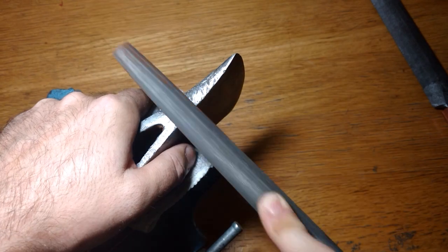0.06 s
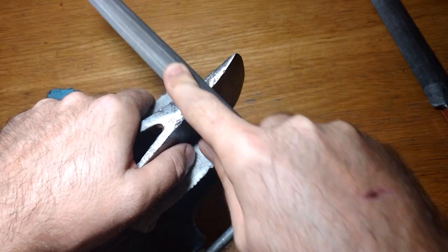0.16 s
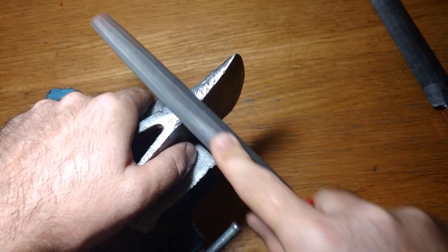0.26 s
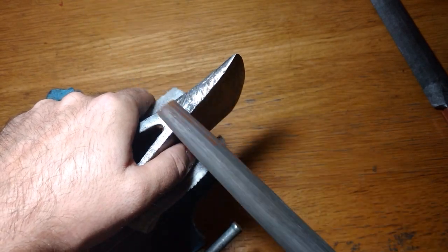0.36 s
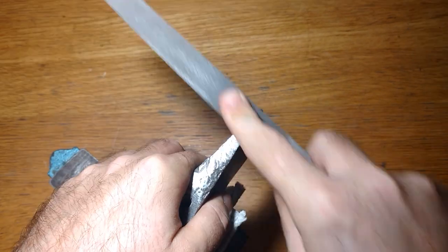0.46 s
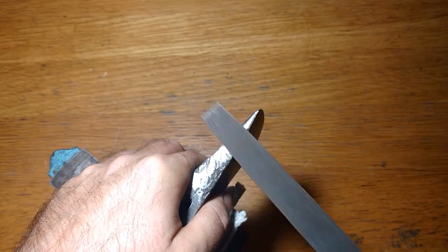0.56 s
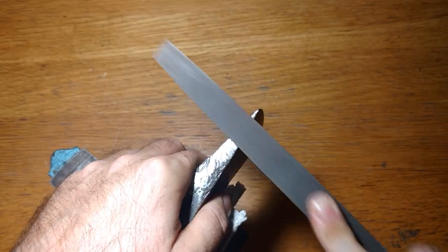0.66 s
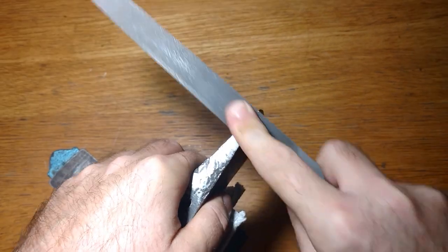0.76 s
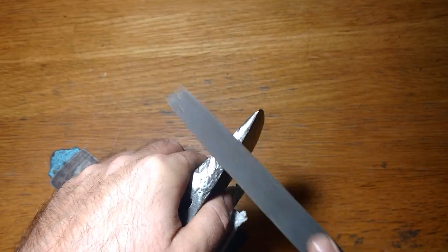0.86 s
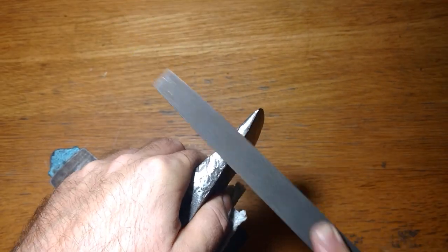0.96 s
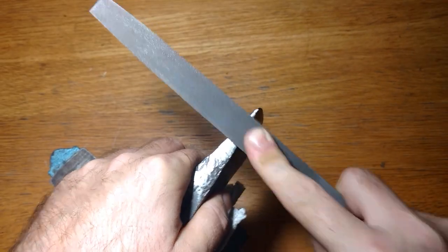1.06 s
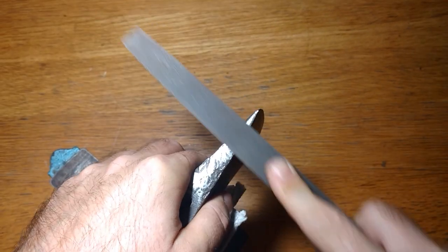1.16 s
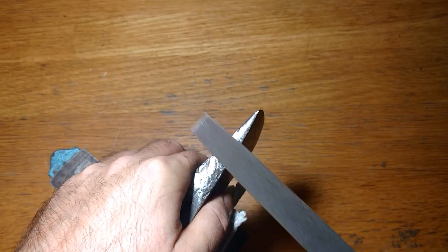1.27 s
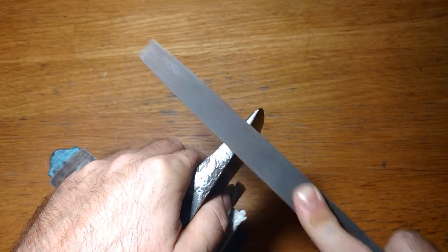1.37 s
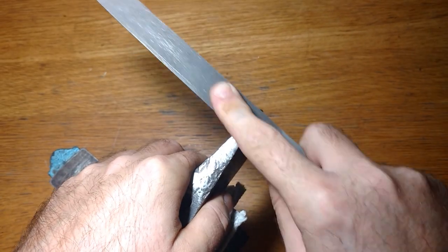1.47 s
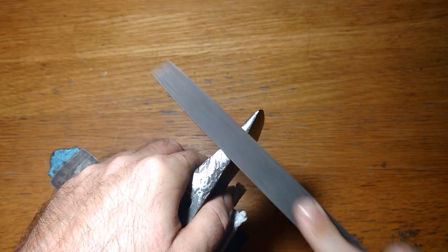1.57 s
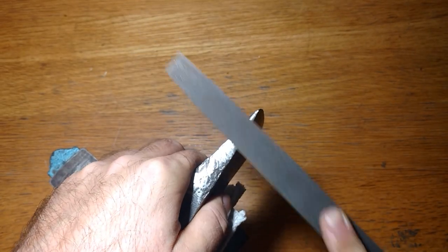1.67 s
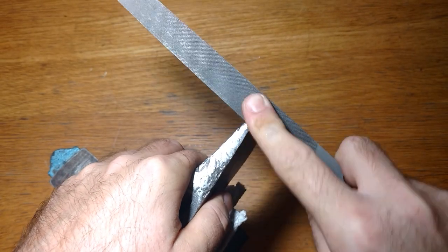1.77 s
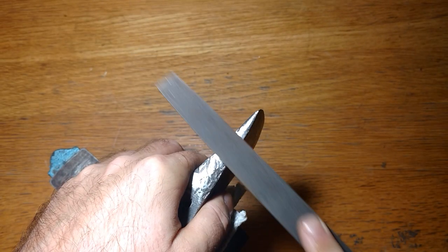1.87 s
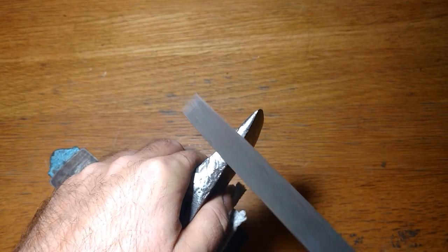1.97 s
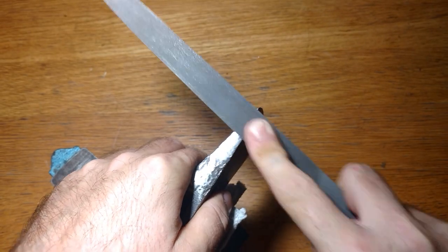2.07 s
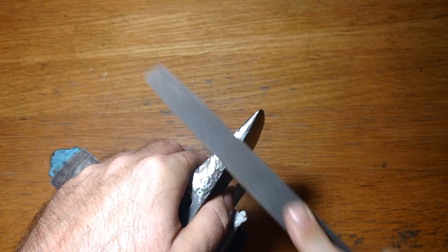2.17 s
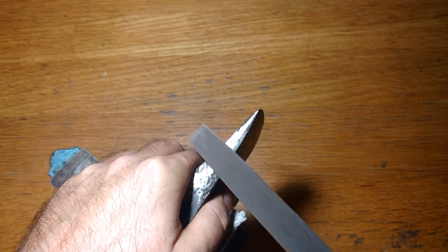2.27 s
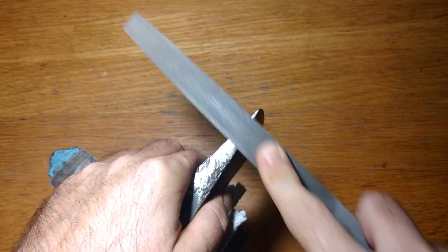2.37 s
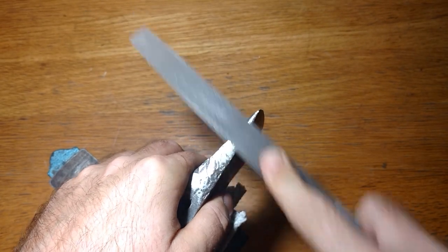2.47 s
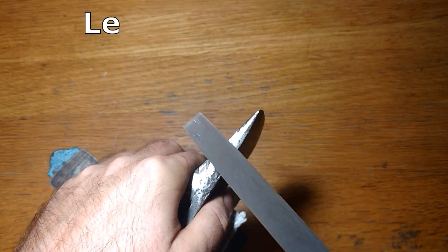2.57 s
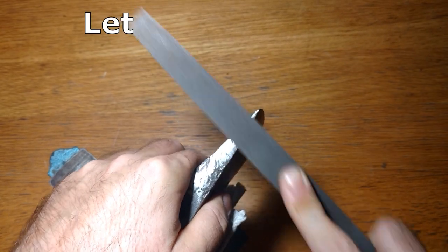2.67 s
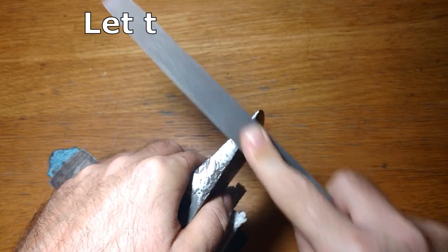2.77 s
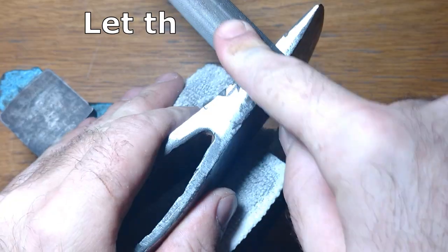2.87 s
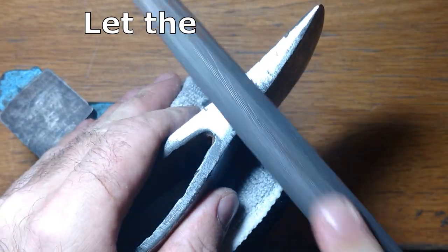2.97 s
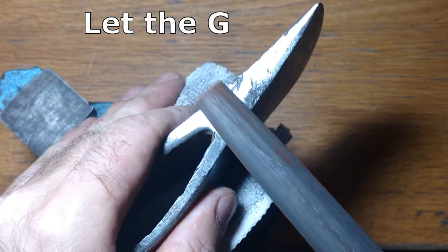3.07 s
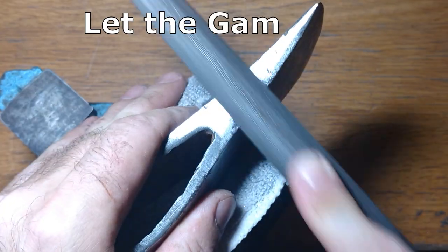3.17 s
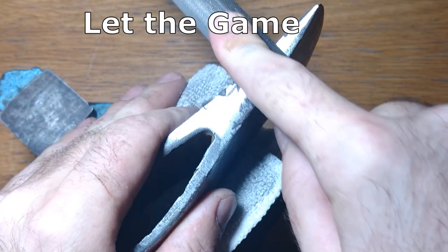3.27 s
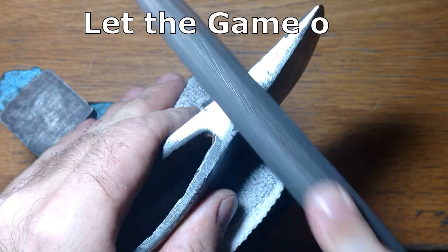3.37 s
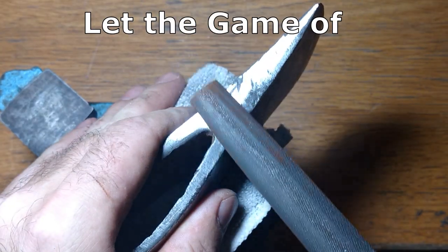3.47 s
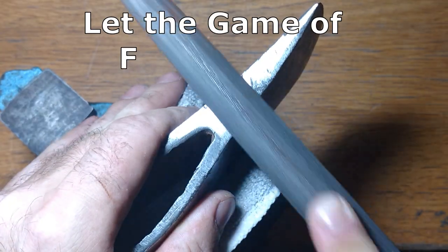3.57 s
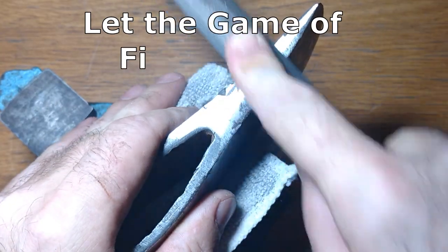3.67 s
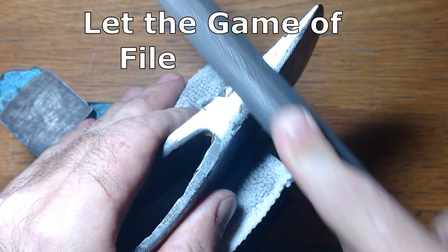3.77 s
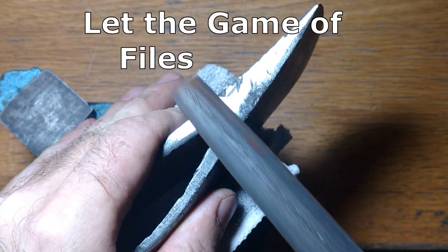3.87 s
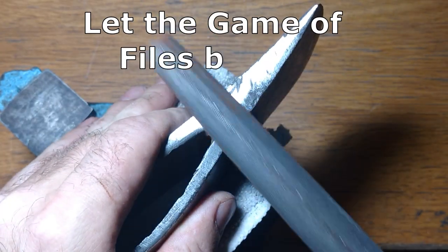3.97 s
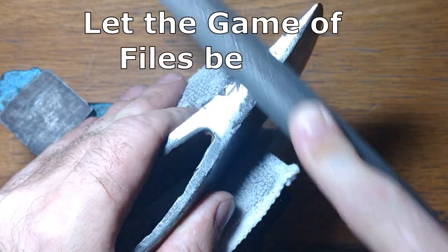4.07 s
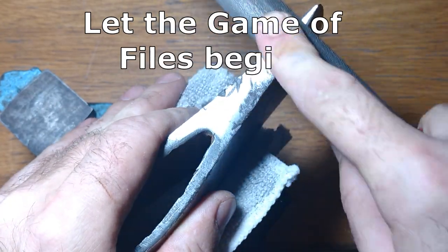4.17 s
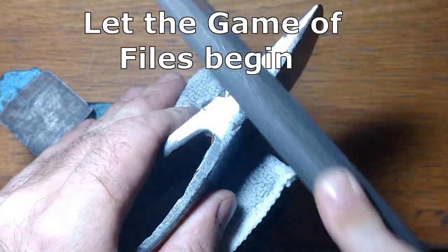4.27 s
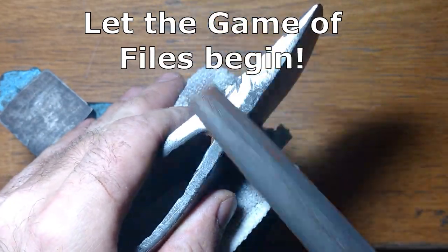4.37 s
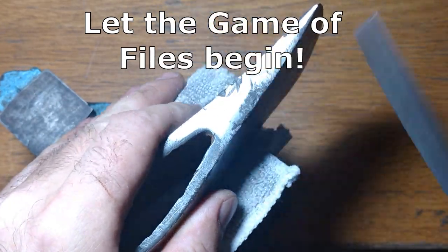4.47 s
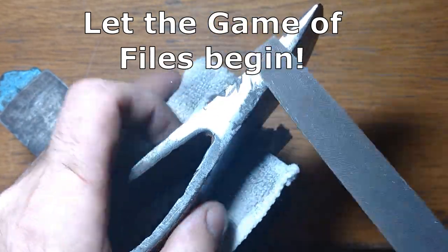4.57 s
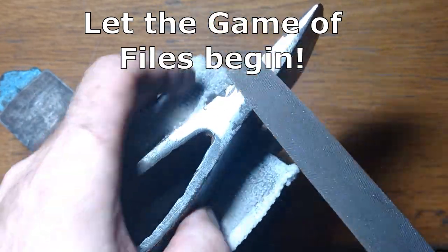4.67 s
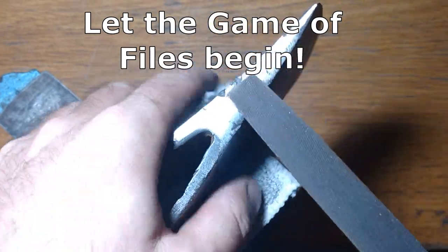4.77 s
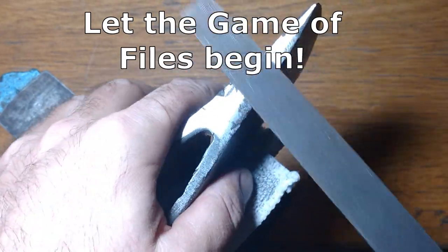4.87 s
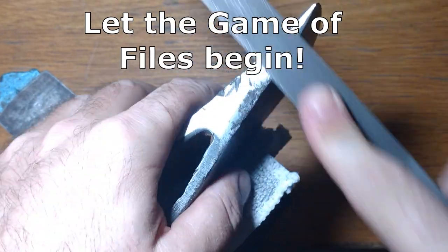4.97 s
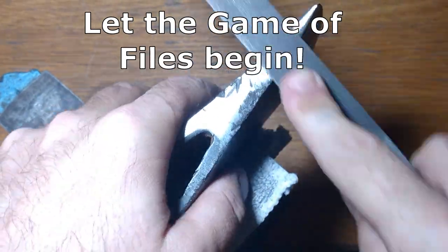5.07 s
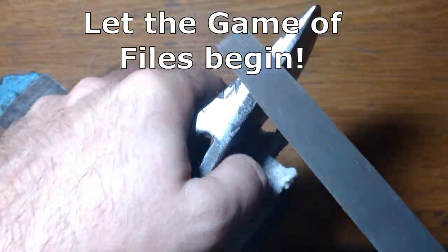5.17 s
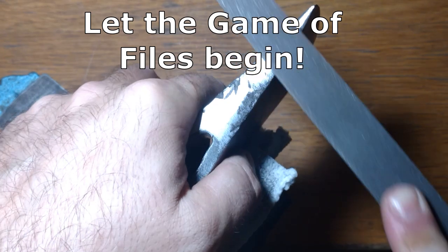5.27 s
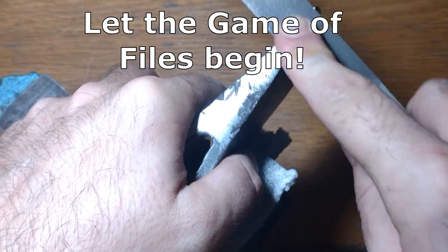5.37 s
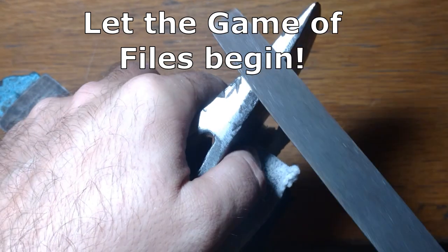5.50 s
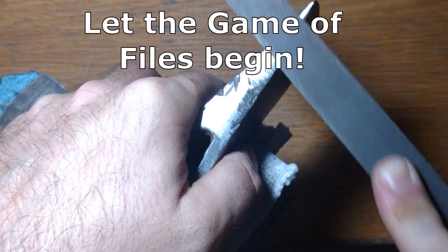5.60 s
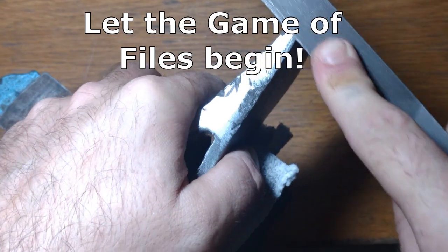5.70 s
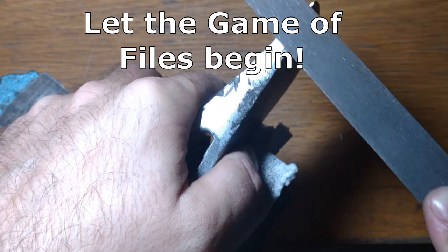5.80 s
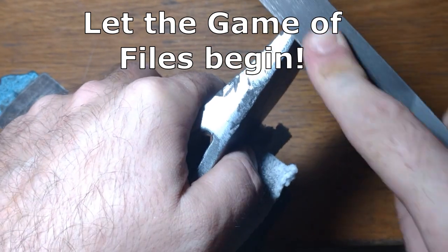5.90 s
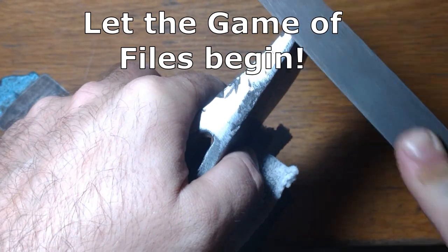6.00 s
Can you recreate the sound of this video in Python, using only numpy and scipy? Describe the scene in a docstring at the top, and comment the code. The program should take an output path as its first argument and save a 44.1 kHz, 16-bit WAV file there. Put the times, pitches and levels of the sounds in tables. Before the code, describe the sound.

A hand file rasps rapidly back and forth over a clamped steel head, pauses for a lift and a click, then resumes its gritty scraping.

```python
"""A hand file rasps back and forth, about six strokes a second, over a steel head held in a vise on a wooden bench.
Teeth and grit ring bench, head and blade through filters; the tooth pitch glides with the hand's speed.
The head judders low in the first push; now and then steel taps steel; the clamped head's ring grows from two seconds.
At about four and a half seconds the file lifts off, is set down again with a click, and filing resumes.
A close pair of microphone ports in a small room, over a soft rush of background air."""
import sys
import numpy as np
from scipy import signal
from scipy.fft import rfft, irfft, next_fast_len
from scipy.io import wavfile
from scipy.ndimage import uniform_filter1d

SR = 44100
rng = np.random.default_rng(int(sys.argv[2]) if len(sys.argv) > 2 else 0)


def transcribe(signal):
    """Save signal, clipped to [-1, 1], as a 16-bit WAV file at the path in sys.argv[1]."""
    frames = np.atleast_2d(signal).T
    limited = np.clip(frames, -1, 1)
    pcm = np.round(limited * 32767).astype(np.int16)
    wavfile.write(sys.argv[1], SR, pcm)


N = 266364
TIME = np.arange(N) / SR
HZ = np.fft.rfftfreq(8192, 1 / SR)  # frequencies at which filter gains are drawn


def filing(chatter_db=0.67, chatter_hz=170, lurch_db=1.13, lurch_hz=35, rasp_db=-5, bench_db=-1.0, head_db=-0.06,
           bite_db=-1.4, blade_db=1.24, thrum_db=-0.4, clamp_db=-2.0):
    """Grit and teeth drive the bench, the head and the file, each as the point of contact favours it."""
    # resonances of the wooden bench, the steel head, the biting teeth and the blade:
    # (frequency [Hz], width [Hz], relative level [dB])
    bench_modes = [(351, 56, -6), (423, 7.7, -3), (534, 16.2, 6), (631, 38, -1), (710, 165, -11.5),
                   (913, 95, -4), (1157, 21.7, -1), (1386, 16, -6), (1464, 10, -18)]
    head_modes = [(1910, 29, -1.5), (1884, 38, -35), (2201, 53, 11.5), (2301, 31, 19.5), (2320, 21, 10),
                  (2523, 23, 6), (2385, 31, 15.5), (2770, 30, -17)]
    bite_modes = [(5030, 37, 3), (5074, 56, 13.5), (5470, 400, 11.6)]
    blade_modes = [(7645, 124, 14), (8200, 550, -9), (10350, 380, -4)]
    # the file's free end, its hiss, the head in the vise and the low thrum of rocking: same columns
    file_end_modes = [(4190, 85, 15), (4260, 230, -10)]
    hiss_modes = [(6580, 330, 10.5), (6060, 120, -24), (7030, 140, 8)]
    clamp_modes = [(426, 54, -4.5), (543.6, 15.3, 15.5)]
    thrum_modes = [(69, 55, -18), (156, 37, -6), (254, 40, -2), (298.6, 20.4, 7)]
    # broad spectrum of the rasp itself: (frequency [Hz], relative level [dB])
    rasp_spectrum = [(40, -29), (200, -44.5), (400, -1.5), (850, 2), (1300, 6), (1650, 1.5), (2050, 6),
                     (2650, 2.5), (3350, 6.5), (3700, 2), (4500, 5.5), (5800, -9.5), (9000, 3),
                     (12000, 1.5), (16000, -8.5)]
    # free end and hiss on a pull, relative to the force: (time [s], free end [dB], hiss [dB])
    file_tone = [(0, -22, -5), (2.2, -22, -6), (3.2, -12.5, -4.5), (4.4, -14.5, -3), (5.1, -15.5, -6.5),
                 (6.04, -25, -5)]
    # ring of the clamped head, before clamp_db: (time [s], level relative to the force [dB])
    clamp_level = [(2.2, -30), (3.2, -16.5), (4.4, -10.5), (5.1, -10)]
    # teeth catch on a burr or dig in; below 0 dB, a brief dip: (time [s], half length [s], extra force [dB])
    snags = [(0.053, 0.0035, -5), (0.254, 0.0092, 6), (0.314, 0.00089, 6.5), (0.405, 0.017, 6.5),
             (0.461, 0.0029, 2), (0.858, .002, -1), (.957, 0.011, 4), (1.028, 0.016, 7), (1.232, 0.0041, 9),
             (1.32, .002, 3), (1.405, 0.018, 3), (1.563, 0.0044, 3), (1.656, 0.0022, 0),
             (1.875, 0.0091, 1.5), (1.979, 0.0068, 5), (2.198, .007, 4.5), (2.288, 0.011, 8),
             (2.487, 0.014, 6), (2.536, .01, 7), (2.686, 0.0082, 4.5), (2.849, 0.0093, 4),
             (2.98, 0.0074, 1), (3.402, 0.0047, 0), (3.475, 0.011, 5), (3.816, 0.0071, -1.5),
             (3.897, .002, 6), (4.263, .006, 2), (4.343, .002, 5.6), (4.398, 0.0088, 5),
             (4.464, 0.011, 10.5), (5.035, 0.013, 5.5), (5.124, 0.006, 14), (5.215, 0.016, 3),
             (5.394, 0.013, 4.5), (5.508, .003, 4), (5.572, .012, 2), (5.795, 0.0027, -3)]
    # teeth fall in step with the head and its ring flares; below 0 dB it dips: (time [s], extra level [dB])
    flares = [(.252, 7.5), (.35, 8.5), (.575, 6), (.885, 10.5), (1.1, 4), (1.275, 15), (1.41, 1),
              (1.607, 10.5), (1.8, 8), (2.38, 7), (2.631, 10), (2.902, 12.5), (2.993, 17), (3.075, 12),
              (3.404, 12), (3.484, 14), (3.615, 7.5), (3.724, 12), (3.83, 5), (4.057, -3), (4.396, 9),
              (5.155, 10), (5.4, -6), (5.571, 11.5)]
    flare_half_s = 0.019
    push_end_db, push_hiss_db = 5.5, -2  # added on a push

    push, speed, force_db, bench, head, bite, blade, rocking = hand()
    snag_db = sum(db * bump(s, half_s) for s, half_s, db in snags)
    force = amp(force_db + snag_db)
    flare = sum(db * bump(s, flare_half_s) for s, db in flares)
    free_end, hiss = curves(file_tone)
    clamp = curves(clamp_level)[0]

    chatter = unit(amp(chatter_db * wander(chatter_hz) + lurch_db * wander(lurch_hz)))
    tooth = chatter * teeth(speed)
    rasp = colour(shifting(grit(chatter)) + tooth, amp(at_hz(rasp_spectrum, HZ)))
    sound = amp(rasp_db) * unit(rasp)
    sound += chatter * squeals()

    drive = shifting(grit(chatter)) + .5 * tooth
    parts = [(bench_modes, bench + bench_db),
             (head_modes, head + flare + head_db),
             (bite_modes, bite + bite_db),
             (blade_modes, blade + blade_db),
             (file_end_modes, free_end + push_end_db * push),
             (hiss_modes, hiss + push_hiss_db * push),
             (clamp_modes, clamp + clamp_db)]
    for modes, db in parts:
        sound += amp(db) * unit(colour(drive, ringing(modes)))
    sound += amp(rocking + thrum_db) * unit(colour(grit(chatter), ringing(thrum_modes)))
    return force * sound


def hand():
    """Strokes become running controls: direction, speed, force dB and the dB of bench, head, bite, blade, rocking."""
    # one row a stroke: (start [s], length [s], direction 0 pull 1 push, mid-stroke force [dB], attack [s],
    # release [s], swell from start to end [dB]), then, relative to the force before the slide along the file,
    # (bench [dB], head ring [dB], blade [dB], rocking [dB])
    stroke_rows = [(-0.07, 0.15, 0, -19, 0.05, 0.044, -28, -17, -4.5, -9.5, -18),
                   (0.079, 0.2, 1, -20.5, 0.061, 0.061, 8, -11, -10.5, -23.5, -21),
                   (0.292, 0.16, 0, -15.5, 0.035, 0.15, 8.5, -24, -10, -13, -36),
                   (0.453, 0.071, 1, -15.5, 0.019, 0.094, -6.5, -4, -6.5, -9, -11.5),
                   (0.518, 0.16, 0, -23, 0.05, 0.035, -12, -15.5, -10, -10.5, -33),
                   (0.673, 0.16, 1, -21.5, 0.054, 0.042, 2.5, -3.5, -4.5, -10.5, -9),
                   (0.845, 0.15, 0, -21.5, 0.022, 0.074, 1, -15.5, -13.5, -11, -31),
                   (0.993, 0.21, 1, -28.5, 0.011, 0.052, 20.5, 1, -2.5, -15, -3.5),
                   (1.212, 0.14, 0, -20.5, 0.03, 0.057, 9.5, -11, -16, -13, -22),
                   (1.359, 0.2, 1, -23.0, 0.0049, 0.049, 16, -3.5, -3.5, -13.5, -10.5),
                   (1.552, 0.14, 0, -24, 0.01, 0.04, -1, -12.5, -14.5, -5.5, -29),
                   (1.699, 0.16, 1, -20.5, 0.096, 0.017, -9.5, -5, -6, -12.5, -10.5),
                   (1.857, 0.16, 0, -23.5, 0.018, 0.027, -10.5, -15, -8.5, -9.5, -29.5),
                   (2.015, 0.15, 1, -14.5, 0.17, 0.089, 8, -2.5, -7, -14, -8),
                   (2.175, 0.13, 0, -25, 0.0057, 0.059, 17, -14, -9.5, -22, -28),
                   (2.325, 0.18, 1, -21.5, 0.16, 0.034, -10, -6, -6, -17.5, -7.5),
                   (2.511, 0.14, 0, -26.0, 0.023, 0.037, -0.5, -16.5, -8.5, -7, -34),
                   (2.659, 0.17, 1, -19, 0.16, 0.056, -1, -9, -5.5, -14, -12),
                   (2.829, 0.12, 0, -14, 0.12, 0.073, -14.5, -12.5, -6, -12.5, -20.5),
                   (2.949, 0.19, 0, -21, 0.032, 0.084, -6, -19, -10.5, -11.5, -33),
                   (3.141, 0.2, 1, -24, 0.06, 0.058, 7, -12, -3.5, -15, -19.5),
                   (3.351, 0.21, 0, -25, 0.042, 0.063, -12, -15, -9, -11, -36),
                   (3.546, 0.237, 1, -26.5, 0.048, 0.054, 12.5, -8.5, -5.5, -16, -15),
                   (3.785, 0.2, 0, -23.5, 0.031, 0.086, -8.5, -13, -6.5, -14, -36),
                   (3.984, 0.25, 1, -25, 0.1, 0.048, 7, -9, -4.5, -15.5, -16),
                   (4.235, 0.25, 0, -24, 0.039, 0.11, 3.5, -12.5, -8, -10, -33),
                   (4.767, 0.055, 1, -47, 0.016, 0.033, -1, -11, -10, -8, -28),
                   (4.849, 0.26, 1, -31, 0.1, 0.025, 12.5, -5.5, -6.5, -28, -15),
                   (5.108, 0.16, 0, -21, 0.12, 0.068, -14.5, -18, -7, -16, -38),
                   (5.279, 0.18, 1, -25, 0.053, 0.071, 16.5, -6, -3.5, -18, -50.5),
                   (5.451, 0.15, 0, -22.5, 0.016, 0.06, 9.5, -11.5, -9.5, -14, -42),
                   (5.616, 0.16, 1, -22, 0.042, 0.072, -6, -5.5, -4.5, -17, -32),
                   (5.767, 0.12, 0, -24.0, 0.03, 0.041, -6, -14, -10.5, -3.5, -41),
                   (5.889, 0.15, 1, -23.5, 0.056, 0.012, -7.5, -8, -6.5, -13.5, -38)]
    # the contact slides along the file: (share of the stroke 0-1, bench [dB], head ring [dB], bite [dB],
    # blade [dB], rocking [dB])
    along_pull = [(.15, 0.5, 0, -2, 4.5, 10), (.5, 4.5, -2.5, -6, -3.5, -9.5),
                  (.85, -0.5, 2.5, -3.5, -3, 0)]
    along_push = [(.15, -3.1, 0.61, -4, 5, -3), (.5, 0.046, -1.3, -7.5, 10.5, -5.5),
                  (.85, -0.17, -0.076, -3.5, 8, -2.5)]
    turn_depth_db, turn_curve = 24, 2.286  # the force sinks at each end of a stroke, along a power curve
    catch_s, catch_db = 0.011, 3.5  # on a pull the file skates this long, this much softer, before teeth catch

    controls = np.zeros((8, N))
    controls[2] = -120  # no force between strokes
    for start, length, direction, force_db, attack, release, swell_db, bench, head, blade, rocking in stroke_rows:
        # the end is held for 20 ms or until the next stroke begins
        now = (TIME >= start) & (TIME < start + length + .02)
        u = np.clip((TIME[now] - start) / length, 0, 1)  # share of the stroke done
        push = direction > .5
        speed = abs(np.sin(np.pi * u))
        setting_off = np.maximum(1 - u * length / attack, 0) ** turn_curve
        stopping = np.maximum(1 - (1 - u) * length / release, 0) ** turn_curve
        turning_db = turn_depth_db * (setting_off + stopping)
        skating_db = 0 if push else catch_db / (1 + (u * length / catch_s) ** 8)
        stroke_db = force_db + swell_db * (u - .5) - turning_db - skating_db
        place, *along = np.transpose(along_push if push else along_pull)
        levels = (bench, head, 0, blade, rocking)
        parts = [db + np.interp(u, place, shape) for db, shape in zip(levels, along)]
        controls[:, now] = [np.full(len(u), push), speed, stroke_db, *parts]
    return controls


def grit(chatter, chips_per_s=1800, chip_share=0.37):
    """Dense friction noise and single chips breaking off, under the chatter of the file."""
    chips = unit(rng.random(N) < chips_per_s / SR)
    friction = np.sqrt(1 - chip_share) * rng.standard_normal((2, N))
    cracks = np.sqrt(chip_share) * chips * rng.choice([-1, 1], (2, N))
    return chatter * (friction + cracks)


def shifting(x, patchy_db=4.0):
    """As the contact slides it favours ever different bending modes, each for a few hundredths of a second."""
    z = signal.stft(x, nperseg=512)[2]
    patches = rng.standard_normal(z.shape[1:])
    patches = uniform_filter1d(patches, size=6, axis=0)  # across frequency
    patches = uniform_filter1d(patches, size=5, axis=1)  # across time
    return unit(signal.istft(z * amp(patchy_db * unit(patches)), nperseg=512)[1][:, :N])


def teeth(speed, top_hz=3900, teeth_db=-10):
    """The tooth rate and level rise and fall with the hand's speed in each stroke."""
    return amp(teeth_db) * speed * tooth_tone(top_hz * speed)


def squeals(length_s=0.021, octaves_per_s=16):
    """Teeth bite and squeal while the hand speeds up: short rough tones that glide upward."""
    # (time [s], pitch at that time [Hz], level relative to the force [dB])
    squeal_rows = [(0.019, 1299, -3.5), (.62, 1467, -3.5), (.915, 3440, -9), (1.275, 3300, -6.5),
                   (1.572, 3790, -1), (1.925, 3510, -21), (2.25, 3420, -13), (2.575, 3462, -7),
                   (2.905, 2106, -14.5), (3.019, 3203, -5), (3.426, 3400, -6.5), (5.171, 3660, -3),
                   (5.214, 1754, -10), (5.51, 3380, -6), (5.55, 1286, -10), (5.802, 3775, 1.5)]
    s, hz, db = np.transpose(squeal_rows)
    nearest = np.argmin(abs(TIME[:, None] - s), axis=1)
    age = np.clip(TIME - s[nearest], -.07, .07)
    envelope = amp(db[nearest]) * np.exp(-(age / length_s) ** 2)
    return envelope * tooth_tone(hz[nearest] * 2 ** (octaves_per_s * age))


def tooth_tone(rate_hz, jitter=.11, jitter_hz=600, overtone=0.56):
    """Unevenly spaced teeth strike the edge: a rough tone."""
    uneven = 1 + jitter * np.array([wander(jitter_hz), wander(jitter_hz)])
    phase = 2 * np.pi * np.cumsum(rate_hz * uneven, axis=1) / SR
    return unit(np.sin(phase) + overtone * np.sin(2 * phase))


def taps(ring_db=-29, ring_t60=0.12):
    """Steel taps steel: short bright noise clicks with a faint ring, damped by the hand."""
    # (time [s], relative level [dB], click decay by 60 dB [s])
    tap_rows = [(.3023, -18, 0.009), (2.178, -19, 0.0046), (2.4825, 0, 0.0025), (3.352, -39, 0.0055),
                (4.644, -4, 0.0042), (4.699, -24, 0.015)]
    # spectrum of a tap: (frequency [Hz], level [dB])
    tap_spectrum = [(100, -35.5), (1500, -11.5), (4500, -8), (7000, -2), (11000, 1), (16000, -10)]
    blows = np.zeros((2, N))
    for s, db, t60 in tap_rows:
        age = np.maximum(TIME - s, 0)
        click = amp(-60 * age / t60)
        ring = amp(ring_db - 60 * age / ring_t60)
        blows += (TIME >= s) * amp(db) * (click + ring)
    return colour(blows * rng.standard_normal((2, N)), amp(at_hz(tap_spectrum, HZ)))


def growl(at_s=0.19, length_s=0.093, growl_db=-35):
    """The head judders low in the first push: resonant noise, the same in both ports."""
    # (frequency [Hz], width [Hz], relative level [dB])
    growl_modes = [(282, 27, 3), (358, 30, 7), (446, 50, 1)]
    judder = unit(colour(rng.standard_normal((1, N)), ringing(growl_modes)))
    return amp(growl_db) * np.exp(-((TIME - at_s) / length_s) ** 4) * judder


def room(x, wet_db=-15):
    """The small room's diffuse tail, decaying noise whose treble dies first."""
    # decay by 60 dB: (frequency [Hz], time [s])
    room_t60 = [(1000, 0.15), (3000, 0.095), (12000, 0.047)]
    # colour of the tail: (frequency [Hz], level [dB])
    room_colour = [(700, 0.5), (4000, -2.5), (12000, -30)]
    hz, t, z = signal.stft(rng.standard_normal((2, SR // 2)), SR, nperseg=256)
    decay = amp(-60 * t / at_hz(room_t60, hz)[:, None])
    build_up = np.minimum(t / 0.041, 1)
    tail = signal.istft(z * decay * build_up, SR, nperseg=256)[1]
    wet = signal.fftconvolve(x, tail / np.linalg.norm(tail[0]), axes=1)[:, :N]
    return amp(wet_db) * colour(wet, amp(at_hz(room_colour, HZ)))


def air():
    """A soft rush of shaped noise that swells up to the lift-off, drops around the click and swells again."""
    # spectrum: (frequency [Hz], relative level [dB])
    air_spectrum = [(24, -66), (40, -32), (382, -3.5), (467, -32), (529, -4.5), (2210, -17), (4680, -27.5),
                    (6330, -26.5), (7360, -26.5), (16000, -35)]
    # (time [s], level [dB])
    air_level = [(0, -65), (4.4, -48), (4.52, -44), (4.63, -44), (4.68, -54.5), (4.85, -53), (5.1, -51.5),
                 (6.04, -44)]
    rush = unit(colour(rng.standard_normal((2, N)), amp(at_hz(air_spectrum, HZ))))
    return amp(curves(air_level)[0]) * rush


def ports(pair):
    """Two signals become a partly alike pair with the phase and balance of the microphone ports."""
    # (frequency [Hz], left lead [rad])
    port_phase = [(400, 3.0), (700, 2.2), (900, .3), (1300, -.3), (3700, 0), (4800, -.7), (5400, -2.5),
                  (5900, -3.1), (6600, -3.18), (7400, -3.7), (9200, -6.5), (11000, -8.7), (13500, -9.6),
                  (15000, -12.5)]
    # (frequency [Hz], likeness 0-1)
    port_likeness = [(150, .96), (300, .86), (420, .25), (1500, .65), (2300, .92), (3200, .99), (4600, .75),
                     (5500, .9), (6000, .998), (6700, .998), (8000, .55), (12500, .88), (15000, .6)]
    # (frequency [Hz], left minus right [dB])
    port_balance = [(330, 0.5), (528, -5.5), (680, 8.5), (790, -5.5), (1179, 5), (1450, 1), (3400, 0),
                    (4700, -3), (7000, 0)]
    length = 2 * next_fast_len(N)
    f = np.fft.rfftfreq(length, 1 / SR)
    a, b = rfft(pair, length)
    alike = np.clip(at_hz(port_likeness, f), 0, 1)
    turn = np.exp(1j * at_hz(port_phase, f))
    lean = amp(at_hz(port_balance, f) / 2)
    left = a * turn * lean
    right = (alike * a + np.sqrt(1 - alike ** 2) * b) / lean
    return irfft(np.array([left, right]))[:, :N]


def amp(db):
    """Decibels to gain."""
    return 10 ** (np.asarray(db) / 20)


def unit(x):
    """Scales to rms 1."""
    return x / np.sqrt(np.mean(x ** 2) + 1e-20)


def at_hz(points, hz):
    """Reads a spectrum on a log-frequency axis."""
    f, value = np.transpose(points)
    return np.interp(np.log(hz + 1), np.log(f), value)


def curves(rows):
    """Each column of a timed table, sample by sample."""
    s, *columns = np.transpose(rows)
    return [np.interp(TIME, s, c) for c in columns]


def bump(s, half_s):
    """A smooth rise to 1 and fall around a moment."""
    return np.exp(-np.minimum(((TIME - s) / half_s) ** 2, 50))


def wander(rate_hz):
    """Random motion, mostly slower than a given rate."""
    f = np.fft.rfftfreq(N, 1 / SR)
    return unit(irfft(rfft(rng.standard_normal(N)) / (1 + (f / rate_hz) ** 2), N))


def colour(x, gain):
    """Causal minimum-phase filter with the given gain over HZ."""
    log_gain = np.log(np.maximum(np.r_[gain, gain[-2:0:-1]], 1e-5))
    response = np.fft.ifft(np.exp(np.conj(signal.hilbert(log_gain)))).real[:len(HZ)]
    return signal.oaconvolve(x, response[None], axes=1)[:, :N]


def ringing(modes):
    """Gain of a set of resonances, with steep skirts below the first row and above the last."""
    power = sum(amp(db) ** 2 / (1 + ((HZ - hz) / (width / 2)) ** 2) for hz, width, db in modes)
    low_hz, high_hz = .9 * modes[0][0], 1.2 * modes[-1][0]
    low_skirt = 1 + (low_hz / (HZ + 1)) ** 6
    high_skirt = 1 + (HZ / high_hz) ** 10
    return np.sqrt(power / low_skirt / high_skirt)


def scene():
    """File and taps close to the microphone ports, in a small room with its air."""
    direct = filing() + taps()
    soft_ends = signal.windows.tukey(N, .002)
    return ports(soft_ends * (direct + room(direct) + air())) + growl()


def record(dry):
    """The recorder's band limit, a steep low-pass."""
    edge_hz = 16100
    low_pass = signal.firwin(401, edge_hz, window=("kaiser", 9), fs=SR)
    return signal.oaconvolve(dry, low_pass[None], "same")


dry = scene()
out = record(dry)
transcribe(out)
```